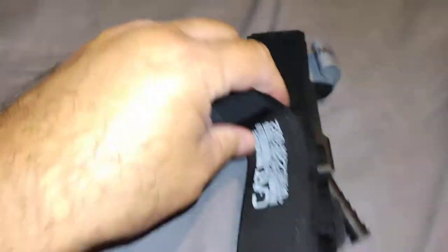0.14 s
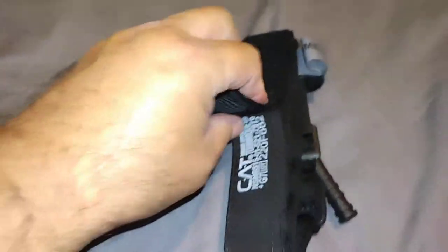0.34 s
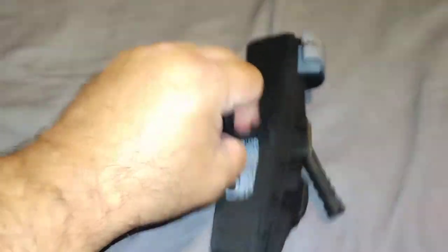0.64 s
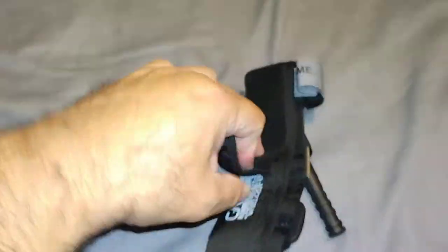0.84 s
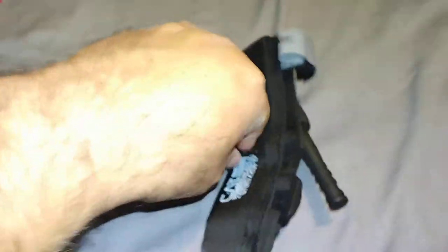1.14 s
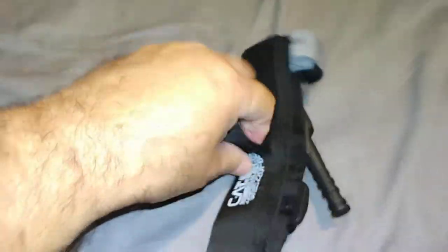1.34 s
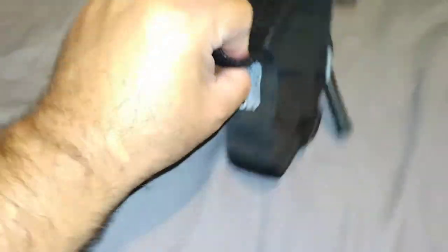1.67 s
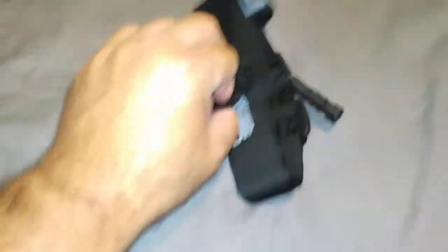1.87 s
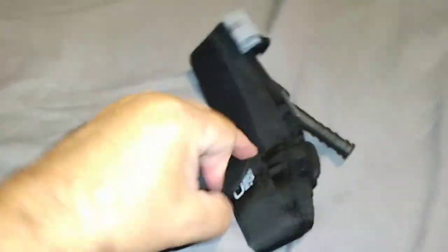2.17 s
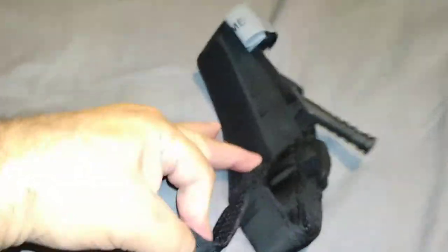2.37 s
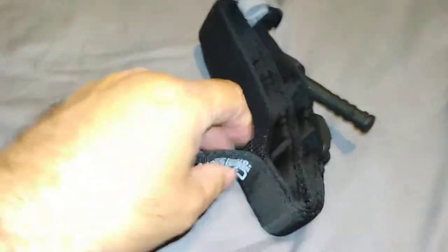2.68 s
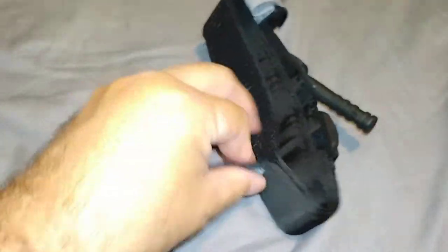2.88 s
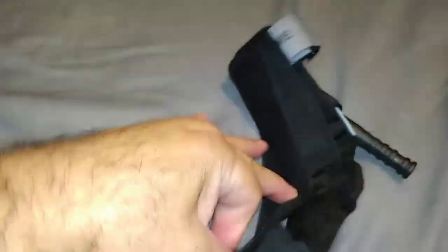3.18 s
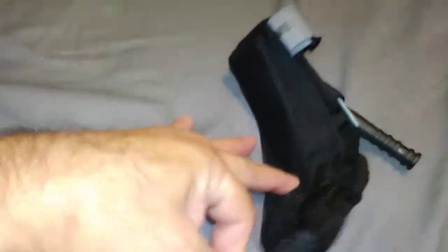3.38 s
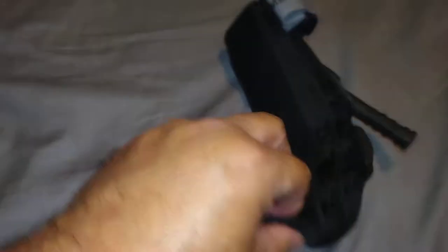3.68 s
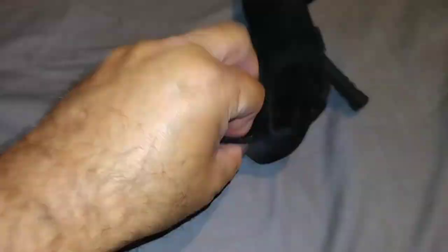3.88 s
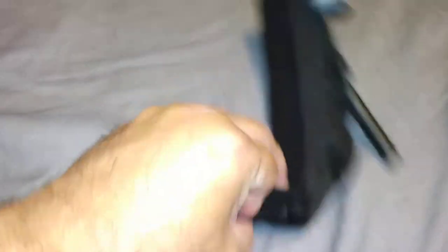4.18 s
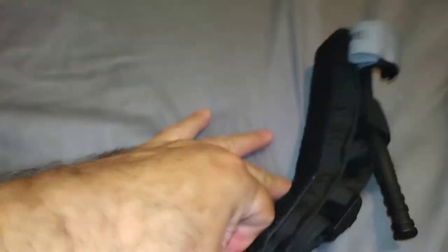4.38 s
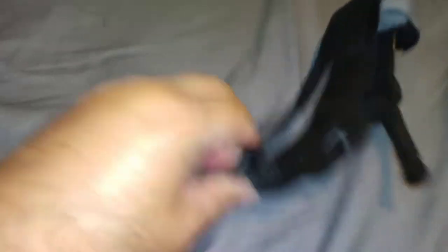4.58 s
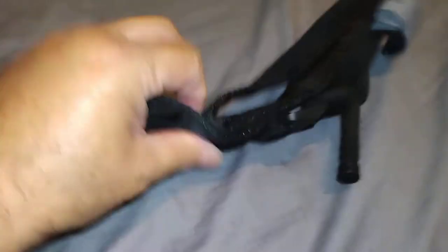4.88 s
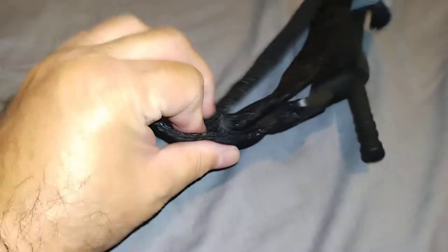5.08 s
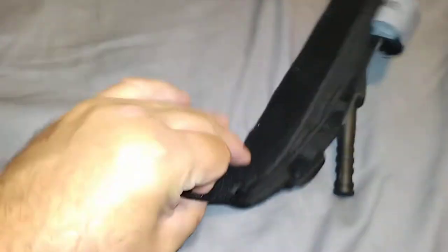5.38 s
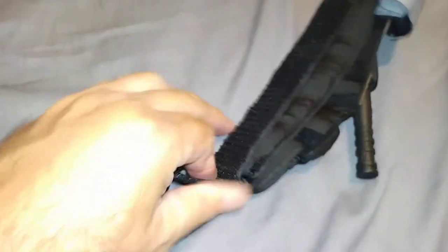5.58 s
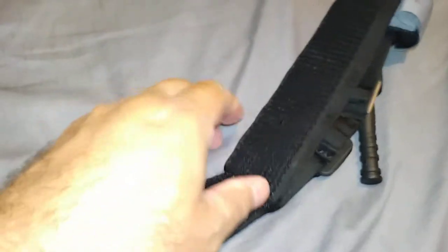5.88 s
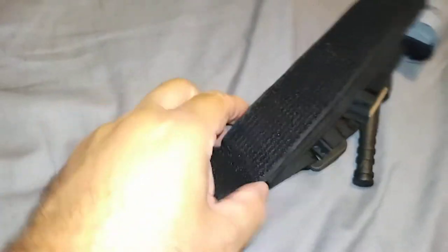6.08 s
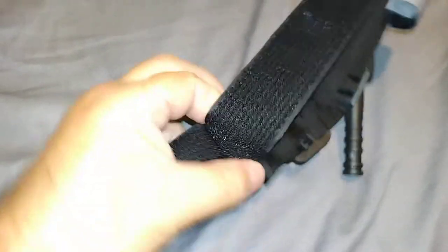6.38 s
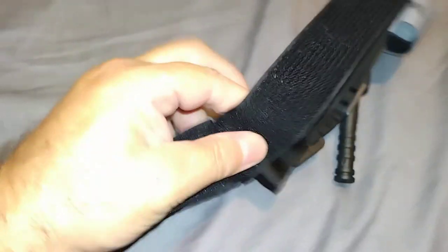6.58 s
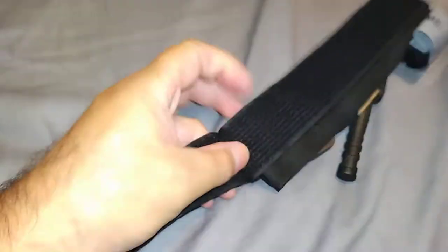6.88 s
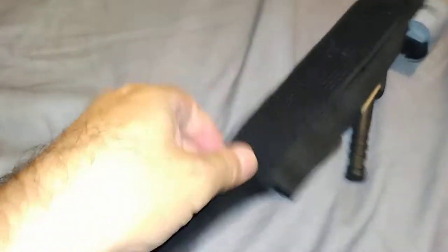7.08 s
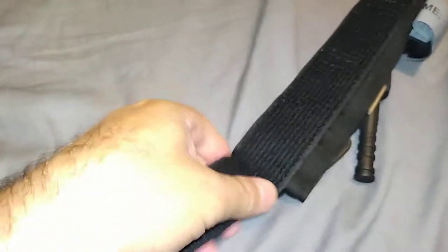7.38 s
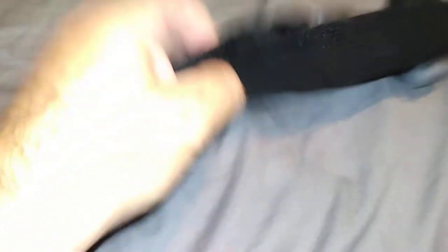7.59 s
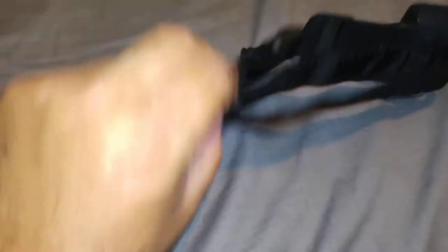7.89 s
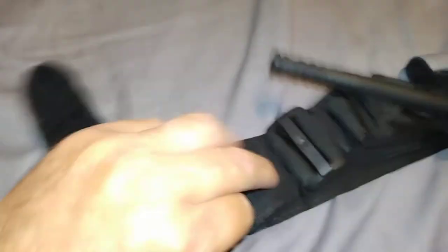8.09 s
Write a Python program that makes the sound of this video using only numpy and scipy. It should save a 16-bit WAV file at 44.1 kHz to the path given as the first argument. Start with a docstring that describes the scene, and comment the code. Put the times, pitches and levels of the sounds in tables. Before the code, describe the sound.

Close stereo pick-up of a hook-and-loop strap on a bed in a quiet room. Soft webbing rustle leads to scattered crisp pops, then a hard ripping tear around two seconds. More short tears with dull bumps follow at about three and four seconds. Afterwards there is a bright crackle, then light rustling with sparse faint ticks and one tiny rough squeak near the end, all over a faint low hum.

```python
"""First a soft rustle of webbing over a faint, low room hum; then a hook-and-loop strap is peeled open on a bed.
Gentle hand moves are flickering hiss with fibre ticks; hooks let go as very short noise bursts, in short slips,
lone pops or dense tears under a hard pull. All of these ring the loose flap, and moves and tears shake the strap.
Soft bumps are short low pushes, low rasps are nearly even pulses ringing a broad resonance,
and one late squeak is a rough tone. A close two-port microphone in a quiet room hears it in stereo."""
import sys
import numpy as np
from scipy import signal
from scipy.fft import rfft, irfft, next_fast_len
from scipy.io import wavfile

SR = 44100
rng = np.random.default_rng(int(sys.argv[2]) if len(sys.argv) > 2 else 0)


def unload_wav(signal):
    """Save mono or channel-first audio to the path in sys.argv[1] as 16-bit WAV at rate SR, clipped to [-1, 1]."""
    wavfile.write(
        sys.argv[1],
        SR,
        np.round(np.clip(np.atleast_2d(signal).T, -1, 1) * 32767).astype(np.int16),
    )


N = 363107
TIME = np.arange(N) / SR
HZ = np.maximum(np.fft.rfftfreq(next_fast_len(N + 4096), 1 / SR), 1)   # 1 Hz floor keeps the logarithm finite


def from_db(db):
    """Decibels to gain."""
    return 10 ** (np.asarray(db) / 20)


def rms_one(x):
    """Scale to an average (rms) strength of 1."""
    return x / np.sqrt(np.mean(x ** 2) + 1e-20)


def in_time(rows):
    """Turn table columns into curves joined by straight lines, one value per sample."""
    s, *columns = np.transpose(rows)
    return [np.interp(TIME, s, column) for column in columns]


def at_hz(points):
    """Read a frequency table at every frequency, along a logarithmic pitch scale."""
    hz, value = np.transpose(points)
    return np.interp(np.log(HZ), np.log(hz), value)


def drift(rate_hz):
    """Random wandering with a spread of 1; a higher rate wanders faster."""
    r = np.exp(-2 * np.pi * rate_hz / SR)
    settle = 8000   # samples dropped while the filter settles
    wander = signal.lfilter([1], [1, -2 * r, r * r], rng.standard_normal(N + settle))
    return rms_one(wander[settle:])


# How far the left port runs ahead: (frequency [Hz], lead [radians])
PORT_LEAD = [(60, 0.046), (1200, 0.78), (1700, 0.1), (3600, 1.5), (5500, 0.6)]
# How alike the two ports hear the sound: (frequency [Hz], share alike [0 to 1])
LIKENESS = [(60, 0.96), (1500, 0.98), (4000, 0.7), (12000, 0.7)]
# Loudness difference between the ports: (frequency [Hz], left over right [dB])
PORT_BALANCE = [(900, 0), (3500, 1.5), (14000, 0.5)]


def colour(pair, spectrum):
    """Shape the tone without ringing ahead of time, then mix shared and private sound into two ports."""
    size = 2 * (len(HZ) - 1)
    log_gain = np.log(from_db(at_hz(spectrum)))
    log_gain -= np.log(np.mean(np.exp(2 * log_gain))) / 2   # only the shape counts, not its overall level
    # folding the cepstrum forward gives a minimum-phase filter
    cepstrum = irfft(log_gain, size)
    cepstrum[1:size // 2] *= 2
    cepstrum[size // 2 + 1:] = 0
    shared, private = rfft(pair, size) * np.exp(rfft(cepstrum))
    alike = np.clip(at_hz(LIKENESS), 0, 1)
    mid = np.sqrt((1 + alike) / 2) * shared
    side = np.sqrt((1 - alike) / 2) * private
    # half of the lead and balance goes to each port
    port = from_db(at_hz(PORT_BALANCE) / 2) * np.exp(.5j * at_hz(PORT_LEAD))
    return irfft([(mid + side) * port, (mid - side) / port], size)[:, :N]


def lifted(pair, lift_db, hz=4500):
    """Tilt the tone about a crossover: treble up by half the lift, the rest down by half."""
    low = signal.sosfilt(signal.butter(2, hz, fs=SR, output="sos"), pair)
    high = signal.sosfilt(signal.butter(2, hz, "high", fs=SR, output="sos"), pair)
    return low * from_db(-lift_db / 2) - high * from_db(lift_db / 2)   # minus keeps the halves in step


def bursts(clicks, rise_s, fall_s):
    """Each click is a very short burst of noise with a softened start."""
    rise, fall = np.exp(-1 / (rise_s * SR)), np.exp(-1 / (fall_s * SR))
    envelope = signal.lfilter([1 - rise], np.convolve([1, -rise], [1, -fall]), clicks + 1e-18)
    return envelope * rng.choice([-1, 1], (2, N))


def grains(per_s, spread_db, clump_db, clump_rate):
    """Random clicks of uneven size that come in clumps."""
    sizes = from_db(spread_db * np.minimum(rng.exponential(1, N), 3))
    chance = per_s * from_db(clump_db * drift(clump_rate)) / SR
    return sizes * (rng.random(N) < chance)


# Tone of the room hum: (frequency [Hz], relative level [dB])
ROOM_TONE, ROOM_DB = [(20, -9), (40, -2), (260, 0.5), (390, 3), (700, -24.5), (1500, -38)], -57.5


def room():
    """The room's low, steady hum is noise with little treble, wavering slightly in level."""
    return from_db(ROOM_DB + 0.5 * drift(4.2)) * colour(rng.standard_normal((2, N)), ROOM_TONE)


# Gentle moves of the hand over the webbing:
# (start [s], length [s], level [dB], treble lift [dB])
RUBS = [(-.06, 0.1, -35.5, 5), (0.027, 0.22, -46, -2), (0.33, 0.35, -47, 17), (0.653, 0.21, -40, -9),
        (0.948, 0.22, -47.5, 6), (1.225, 0.17, -45.5, 7), (1.355, 0.073, -38, 4), (1.375, 0.34, -44.5, 3.5),
        (1.84, 0.12, -41, -0.5), (2.307, 0.071, -35, -7), (2.365, 0.1, -35.5, -12.5),
        (2.492, 0.3, -40.5, 7.5), (2.823, 0.076, -38, 8.5), (3.062, 0.12, -33, -2.5),
        (3.293, .11, -39.5, -19.5), (3.42, 0.23, -40.5, 2.5), (3.614, 0.41, -45.5, -9),
        (4.108, 0.38, -36.5, -5), (4.261, 0.19, -44.5, -11), (4.448, 0.25, -48.5, -13),
        (4.706, 0.23, -45, 8), (5.059, 0.12, -44, -0.5), (5.244, 0.12, -35.5, 10.5),
        (5.347, 0.14, -39.5, 3.5), (5.496, 0.2, -39, 2.5), (5.735, 0.12, -46.5, -4.5),
        (5.832, 0.077, -42, 9), (5.971, 0.094, -43.5, 7.5), (6.061, 0.1, -40.5, -5),
        (6.208, 0.27, -46.5, 2.5), (6.379, 0.35, -42.5, 9.5), (6.707, 0.41, -44, 10.5),
        (7.051, 0.26, -42.5, 2.5), (7.28, 0.14, -47.5, 11), (7.37, 0.42, -44.5, -1),
        (7.805, 0.11, -48.5, 6), (7.961, 0.33, -46, 2)]
RUB_PEAK_AT, RUB_SHARPNESS = 0.42, 1.49   # share of the length where a move is strongest; power of the swell
RUB_SHAKE_DB, DULL_SHAKE = -8.5, 0.91   # shaking against the move; dB lost per dB of lift (dull moves shake more)
REST_DB = -54   # steady faint hiss between the moves
# Hard pulls that tear a run of hooks:
# (start [s], length [s], level [dB], fall by the end [dB], treble lift at the start [dB],
#  treble lift at the end [dB], shaking level [dB], time for shaking to build [s])
TEARS = [(2.146, 0.182, -21, 0.5, -8, 0.5, -27, 0.08), (3.12, 0.11, -23.5, 0, -7, -14, -22.5, 0.0079),
         (3.254, 0.041, -19.5, -0.5, -7.5, -8, -25.5, 0.0012),
         (4.237, 0.067, -24.5, 4, -11, -8, -29.5, 0.0045)]
GRIP_DB_PER_S, LET_GO_DB_PER_S = 1000, 900   # how fast a tear sets in and ends


def pull():
    """Moves swell and fade, tears grip, hold and let go; gives level, treble lift and shaking in dB."""
    t = TIME[::32]   # coarse steps are enough for the hand
    s, length, rub_db, rub_lift = np.transpose(RUBS)[:, :, None]
    # bend time so that the middle of the swell falls at RUB_PEAK_AT
    along = np.clip((t - s) / length, 0, 1) ** (np.log(.5) / np.log(RUB_PEAK_AT))
    rubs = from_db(rub_db) * np.abs(np.sin(np.pi * along)) ** RUB_SHARPNESS
    rub_shake = rubs * from_db(RUB_SHAKE_DB - DULL_SHAKE * rub_lift)

    s, length, tear_db, fall_db, first_lift, last_lift, shake_db, build_s = np.transpose(TEARS)[:, :, None]
    early, late = np.maximum(s - t, 0), np.maximum(t - s - length, 0)
    edges_db = -GRIP_DB_PER_S * early - LET_GO_DB_PER_S * late
    torn = np.clip((t - s) / length, 0, 1)
    tears = from_db(tear_db - fall_db * torn + edges_db)
    tear_lift = first_lift + (last_lift - first_lift) * torn
    tear_shake = from_db(shake_db + edges_db) * np.clip((t - s) / build_s, 0, 1) ** 2

    power = np.sum(rubs ** 2, 0) + np.sum(tears ** 2, 0) + from_db(REST_DB) ** 2
    # the stronger a move is, the more its treble lift counts
    lift = (np.sum(rubs ** 2 * rub_lift, 0) + np.sum(tears ** 2 * tear_lift, 0)) / power
    shake = np.sum(rub_shake ** 2, 0) + np.sum(tear_shake ** 2, 0) + 1e-12
    return in_time(np.transpose([t, 10 * np.log10(power), lift, 10 * np.log10(shake)]))


def flap(pair, centre_hz, ring_db, flicker_db, flicker_rate):
    """The loose flap is a row of damped resonances, strongest near the centre, struck with changing strength."""
    out = pair.copy()
    for hz in np.geomspace(1200, 5000, 10):
        r = np.exp(-np.pi * .12 * hz / SR)   # each ring is 12 % of its pitch wide
        nearness = np.exp(-(np.log2(hz / centre_hz) / 0.59) ** 2)
        struck = pair * nearness * from_db(ring_db + flicker_db * drift(flicker_rate))
        ring = [1, -2 * r * np.cos(2 * np.pi * hz / SR), r * r]
        out += signal.lfilter([(1 - r * r) / 2, 0, (r * r - 1) / 2], ring, struck)
    return out


# Where the flap rings strongest while hooks let go: (time [s], centre [Hz])
FLAP_CENTRE = [(2.1, 3250), (2.33, 2040), (3.3, 1810), (5.2, 2900)]
# Tone of hooks letting go: (frequency [Hz], relative level [dB])
HOOK_TONE = [(400, -22), (800, -14), (1300, -5), (2800, -5.5), (5900, -1.5), (10500, 7.5), (14300, -1)]
# Tone of sliding cloth: (frequency [Hz], relative level [dB])
CLOTH_TONE = [(400, -21.5), (700, -3), (1700, 3.5), (3300, 1), (5800, -4), (10000, -2.5), (14300, -12.5)]
TEAR_FROM_DB = -34.5   # around this pull level, sliding cloth gives way to tearing hooks


def strap(level_db, lift_db):
    """A stronger pull turns sliding cloth (flickering hiss, fibre ticks) into tearing hooks (dense clumps)."""
    tearing = 1 / (1.11 + np.exp((TEAR_FROM_DB - level_db) / 2))
    gain = from_db(level_db)

    hiss = rng.standard_normal((2, N)) * from_db(2.78 * drift(20.0))
    ticks = bursts(grains(350, 4.0, 6.0, 20), .0002, .0005)
    ticks = rms_one(np.diff(ticks, prepend=0))   # single fibres are small and sound bright
    slide = rms_one(hiss + from_db(4.5) * ticks)
    wavering_lift = lift_db + 5 * drift(11)   # the treble of the rustle wavers at random
    cloth = lifted(gain * np.sqrt(1 - tearing) * slide, wavering_lift)

    rip = rms_one(bursts(grains(1500, 3.3, 2.2, 100), .0002, .0005))
    hooks = lifted(gain * np.sqrt(tearing) * rip, lift_db) + slips()

    ringing_hooks = flap(hooks, in_time(FLAP_CENTRE)[0], 7.6, 3.0, 51)
    ringing_cloth = flap(cloth, 2180, -3.4, 3.33, 20)
    return colour(ringing_hooks, HOOK_TONE) + colour(ringing_cloth, CLOTH_TONE)


# Tone of the shaking strap and sheet: (frequency [Hz], relative level [dB])
SHAKE_TONE = [(40, -9), (300, -5.5), (700, -13.5), (1100, -12.5), (2000, -19)]


def shaking(shake_db):
    """Quick uneven jolts make strap and sheet rumble low."""
    jolts = rms_one(bursts(grains(400, 2.0, 2.0, 20), .003, .01))
    return colour(from_db(shake_db) * jolts, SHAKE_TONE)


# Slips of a few hooks in a row: (time [s], strength [dB], length [ms], treble lift [dB])
SLIPS = [(0.4873, -8.5, 3, -1.5), (0.5278, -9.5, 3.7, -8.5), (0.6107, -15.5, 2.0, -8),
         (0.7049, -14.5, 4.5, 0), (0.767, -14, 2.6, 3), (0.7927, -20.5, 8.3, -0.5), (1.497, -19.5, 2.9, 5),
         (1.869, -21, 12.7, 0), (1.8976, -16, 3.7, -11), (2.0148, -14.5, 40, -5), (2.061, -10, 7.8, -5),
         (2.0935, -11, 12.5, -5.5), (2.1141, -19, 7.2, -21), (2.1332, -6, 3.0, -7),
         (2.146, -14.5, 6.5, -18), (2.158, -19, 12, -28), (2.197, -14.5, 10, -20), (2.2215, -10, 8, -6),
         (2.381, -12.5, 8.6, -4), (2.4216, -12, 5.4, -3), (3.163, -15, 17, -21), (3.3421, -15.5, 8, -11),
         (3.350, -11.5, 4, -7), (4.23, -23, 3.5, -3), (4.251, -17, 3, -12), (4.269, -14.5, 6, -16),
         (4.3805, -14, 1.17, -8), (4.8079, -26.5, 10, -14), (5.2326, -26.5, 12.5, 9),
         (5.2532, -20.5, 11, 18), (5.277, -21.5, 2.2, 18), (5.2922, -15.5, 3.3, 3), (5.3185, -21, 13.5, -2),
         (7.0278, -29, 11, 2), (8.042, -25, 2, 5)]
# Lone hooks popping free: (time [s], strength [dB])
POPS = [(0.556, -12), (0.616, -13), (0.66, -13.5), (0.6928, -18), (0.7375, -16), (0.756, -16),
        (1.3633, -18), (1.9073, -12), (2.043, -15), (2.077, -13), (2.375, -22), (2.79, -24.5),
        (3.0684, -11.5), (3.111, -14), (3.3268, -16.5), (4.144, -23.5), (4.196, -21), (4.2138, -22),
        (4.245, -17), (5.3721, -14), (5.4798, -16), (5.857, -32), (5.868, -21), (6.288, -31), (6.3009, -29),
        (6.3537, -19), (6.519, -28), (6.565, -21.5), (6.623, -29), (6.7284, -18.5), (6.7382, -25),
        (6.9206, -18), (6.965, -33), (7.092, -30.5), (7.295, -29), (7.5834, -27), (8.183, -32)]
POP_MS, POP_LIFT_DB = 1.2, 3   # length and treble lift of a pop


def slips():
    """Hooks follow each other at uneven steps, strongest midway; freed fibres flutter faintly after."""
    pops = [(s, db, POP_MS, POP_LIFT_DB) for s, db in POPS]
    s, strength_db, length_ms, lift_db = np.transpose(sorted(SLIPS + pops))[:, :, None]
    chance = rng.random((len(s), 2, 14))   # up to 14 hooks per slip
    after_ms = np.cumsum(0.595 + 2.38 * chance[:, 0], axis=1)
    after_ms -= after_ms[:, :1]
    swell = 0.33 + np.sin(np.pi * np.minimum(after_ms / length_ms, 1)) / 2
    weaker_db = 10.6 * chance[:, 1] * (after_ms > 0)   # no random weakening for the first hook
    sizes = from_db(strength_db + 7.5 - weaker_db) * swell * (after_ms < length_ms)
    clicks = np.zeros(N)
    np.add.at(clicks, np.round((s + after_ms / 1000) * SR).astype(int), sizes)
    snaps = bursts(clicks, 0.00027, 0.00058)
    flutter = from_db(-30) * bursts(clicks, 0.003, 0.011)
    latest = np.clip(np.searchsorted(s[:, 0], TIME) - 1, 0, None)   # the latest slip sets the treble
    return lifted(snaps + flutter, lift_db[latest, 0])


# The strap bumping the sheet: (time [s], strength [dB], basic pitch [Hz])
BUMPS = [(.74, -34, 45), (2.381, -12, 209), (2.42, -14.5, 132), (3.351, -10, 122), (4.28, -17.5, 93),
         (5.28, -31, 61), (5.569, -26, 95.5)]
BUMP_SAG = 0.76   # power of the cycle count: under 1 the pitch falls


def bumps():
    """Each soft bump is a low push that swells over a fraction of a cycle and dies in about two."""
    out = np.zeros(N)
    for s, strength_db, hz in BUMPS:
        cycles = np.maximum(TIME - s, 0) * hz
        swell = cycles * np.exp(-2.2 * cycles)
        out += from_db(strength_db + 6.5) * swell * np.sin(2 * np.pi * cycles ** BUMP_SAG)
    return out


# Short rough low-mid noises, under a tear or a rub or just after one:
# (start [s], length [s], level [dB], ring [Hz])
RASPS = [(1.457, 0.21, -49, 370), (3.107, .1, -30.5, 455), (4.315, 0.087, -38.5, 1170),
         (7.064, 0.12, -54, 860), (7.484, 0.18, -54.5, 960)]
RASP_PULSES_PER_S, RASP_WIDTH = 260, .6   # typical pulse rate; width of the ring as a share of its pitch


def low_rasps():
    """Nearly even pulses of uneven size ring a broad resonance, giving short rough low-mid noises."""
    turns = np.cumsum(RASP_PULSES_PER_S * from_db(2.5 * drift(60))) / SR
    pulse_now = np.diff(np.floor(turns), prepend=0)   # one pulse at each whole turn
    pulses = rms_one(pulse_now * from_db(3.3 * rng.standard_normal(N)))
    out = np.zeros(N)
    for s, length, level_db, hz in RASPS:
        r = np.exp(-np.pi * RASP_WIDTH * hz / SR)
        ring = [1, -2 * r * np.cos(2 * np.pi * hz / SR), r * r]
        ringing = rms_one(signal.lfilter([1], ring, pulses))
        swell = np.sin(np.pi * np.clip((TIME - s) / length, 0, 1))
        out += from_db(level_db) * swell * ringing
    return out


# Path of one short squeak: (time [s], pitch [Hz], level [dB])
SQUEAK = [(7.335, 599, -53), (7.36, 379, -47), (7.415, 496, -38.5), (7.43, 661, -34), (7.46, 623, -56)]


def squeak():
    """A rough stick-slip tone: pitch and strength jitter at random."""
    hz, level_db = in_time(SQUEAK)
    turn = 2 * np.pi * np.cumsum(hz * (1 + .08 * drift(300))) / SR
    sounding = (TIME > SQUEAK[0][0]) & (TIME < SQUEAK[-1][0])
    roughness = from_db(-7 + 6 * drift(500))   # bends the wave, adding overtones
    tone = np.sin(turn + roughness * np.sin(turn))
    return sounding * from_db(level_db + 2.1 * drift(120)) * np.sqrt(2) * tone


# The strap drifts across the ports: (time [s], left over right [dB])
SIDEWAYS = [(0, -0.5), (1.9, 0.5), (6.3, 1.5), (8.2, -1.5)]


def scene():
    """All sources at the two ports; the hand's pull drives both the strap and its shaking."""
    level_db, lift_db, shake_db = pull()
    lean = from_db(in_time(SIDEWAYS)[0] / 2 * np.array([[1], [-1]]))
    moving_strap = lean * strap(level_db, lift_db)
    return room() + moving_strap + shaking(shake_db) + bumps() + low_rasps() + squeak()


OVERLOAD, CUTOFF_HZ = .7, 14300   # size at which peaks are clearly rounded; top of the treble


def record(dry):
    """The highest peaks are rounded, and a steep filter cuts the top of the treble."""
    rounded = dry / (1 + np.abs(dry / OVERLOAD) ** 4) ** (1 / 4)
    return signal.sosfilt(signal.cheby1(12, .5, CUTOFF_HZ, fs=SR, output="sos"), rounded)


dry = scene()
out = record(dry)
unload_wav(out)
```